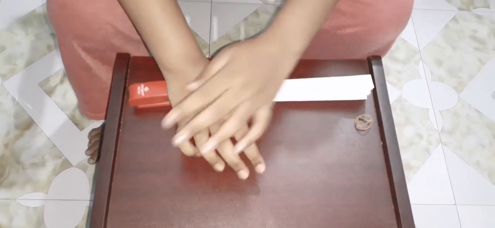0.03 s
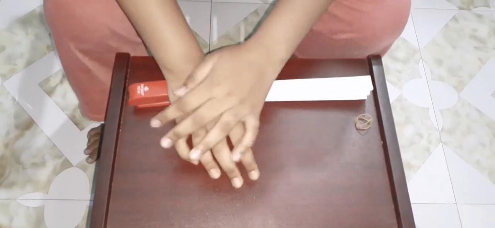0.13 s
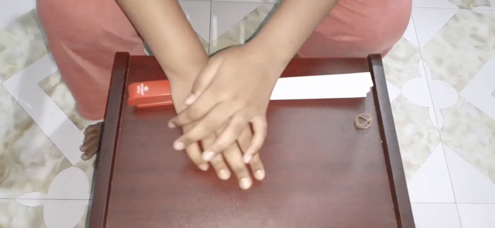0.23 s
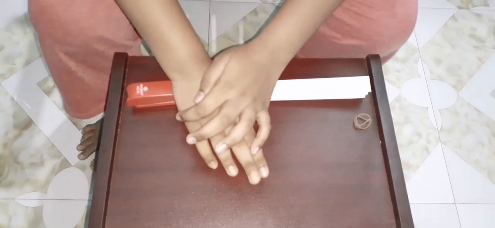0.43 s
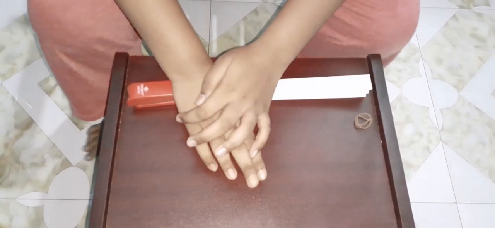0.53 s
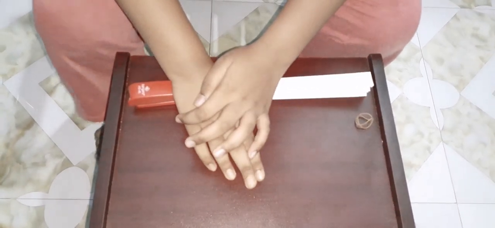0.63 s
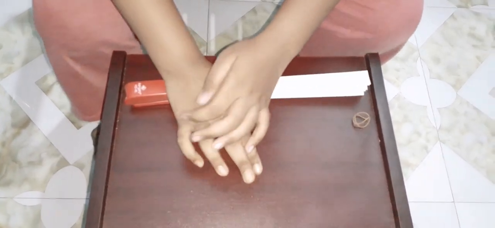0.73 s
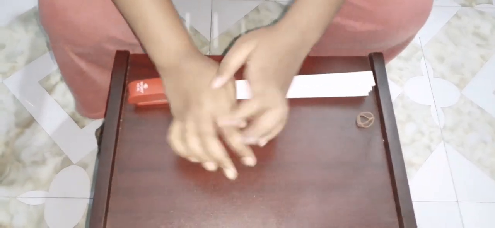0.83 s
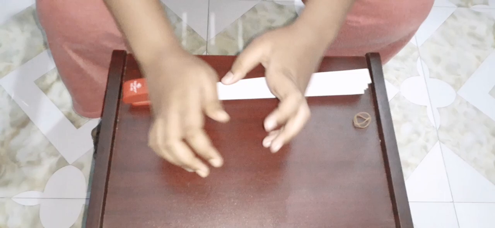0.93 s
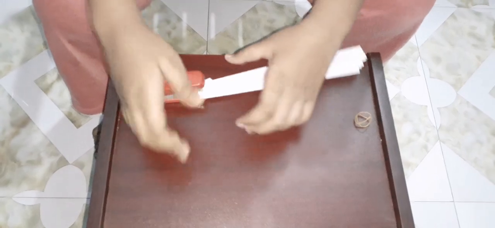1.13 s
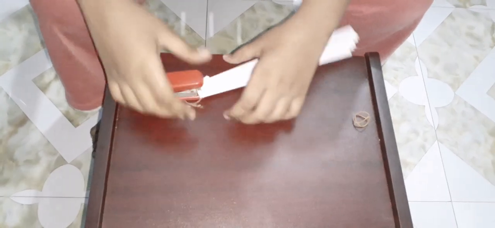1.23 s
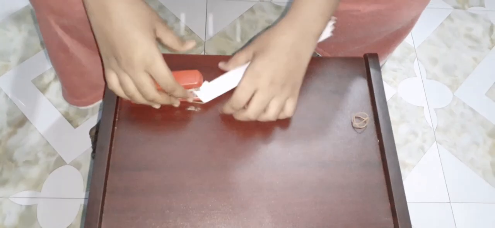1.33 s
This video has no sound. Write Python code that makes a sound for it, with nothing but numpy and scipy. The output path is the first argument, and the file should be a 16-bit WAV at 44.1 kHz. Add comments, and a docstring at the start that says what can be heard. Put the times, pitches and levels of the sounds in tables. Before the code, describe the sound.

Two sharp smacks of fingers land on a small wooden table at about 0.2 and 0.4 seconds, each with a hollow pop and a short wooden ring. Soft bumps surround them as the weight shifts. Near 0.9 seconds the hands slip apart with a light click and swish, then brush faintly along the top until about 1.4 seconds. The room echoes slightly and has a faint hum.

```python
"""Soft bumps, then two sharp smacks of fingers on a small wooden table in a tiled room.
One hand presses on the other, and the table bumps under the shifting weight. Each smack is a quick
cluster of finger contacts that rings the wood, with a hollow pop of trapped air. Then the hands
slip apart with a click and a swish and brush along the top, over a faint hum."""
import sys
import numpy as np
from scipy import signal
from scipy.fft import rfft, irfft
from scipy.io import wavfile
from scipy.ndimage import uniform_filter1d

SR = 44100
rng = np.random.default_rng(int(sys.argv[2]) if len(sys.argv) > 2 else 0)


def put_to_file(sound):
    """Save the sound as 16-bit audio at rate SR, in the file named by the first command-line argument."""
    columns = np.atleast_2d(sound).T  # one column per channel
    safe = np.clip(columns, -1, 1)
    whole_steps = np.round(safe * 32767)
    wavfile.write(sys.argv[1], SR, whole_steps.astype(np.int16))


N = 61739
T = np.arange(N) / SR  # time/s
F = np.arange(N + 1) * SR / (2 * N)  # f/Hz


# fingers hitting the top: t/s, level/dB, rise/s, decay/s, brightness/dB per octave
FINGER_HITS = [(0.2093, -15, 0.0021, 0.0016, -3), (0.2116, -11, 0.0013, 0.0059, -0.8),
               (0.2213, -18.5, .001, 0.009, 4), (0.2238, -20, 0.00074, .005, -1.6),
               (0.4094, -27.5, 0.0018, .002, -0.5), (0.4120, -14, 0.0012, .003, -1.5),
               (0.4171, -9, 0.0024, 0.0035, 0.16), (0.4321, -17, 0.00074, .003, -2)]
# tone of skin on wood: f/Hz, level/dB
SMACK_TONE = [(60, -10.5), (300, 2), (450, 0), (580, -7), (800, -7), (1100, 3), (1500, -2.5), (2000, -1.5),
              (2700, -6.5), (4000, -7), (5500, -5.5), (6200, -9.5), (7000, -6.5), (8500, -10), (9800, -12),
              (11200, -7.5), (12300, -15.5), (15500, -16)]

def smacks():
    """Each finger lands with its own short crack of noise."""
    return sum(undb(db) * shape(burst(start, rise, decay), colour(SMACK_TONE, tilt))
               for start, db, rise, decay, tilt in FINGER_HITS)


# notes the table rings at: f/Hz, level at place 0/dB, level at place 1/dB, ring time/s
WOOD_NOTES = [(180.1, -29, -26.5, 0.27), (227.8, -27.5, -19, 0.3), (262.9, -22, -31, 0.36),
              (298, -35, -45, 0.69), (334.5, -28, -24, 0.39), (414, -27.5, -64, 0.21),
              (582.6, -33, -34, 0.35), (727, -31.5, -59, 0.3), (1028, -28, -22, 0.22),
              (1216, -43, -40, 0.22), (1400, -20.5, -30, 0.049), (1848, -20, -21, 0.048),
              (1938, -24, -45, 0.12), (3153, -25, -64, 0.2), (3875, -24, -36, .08), (4470, -27, -64, 0.16),
              (5450, -55, -28.5, 0.11)]
# blows to the top: t/s, level/dB, place/0-1, rise/s, pop level/dB, pop ring time/s
BLOWS = [(0.2105, 1, 0.07, 0.0013, -10.5, 0.04), (0.417, 0.5, 0.8, 0.00035, -12, 0.053),
         (0.4283, -14, 0.95, 0.0011, -25, .03), (0.8663, -19.5, 0.38, 0.0008, -29.5, 0.02)]

def table_ring():
    """A blow rings all the table's notes at once; where it lands sets the mix."""
    out = np.zeros(N)
    for start, blow_db, place, rise, _, _ in BLOWS:
        for k, (hz, db0, db1, ring_s) in enumerate(WOOD_NOTES):
            note_db = np.interp(place, (0, 1), (db0, db1))
            direction = (-1) ** k  # neighbouring notes swing opposite ways
            out += direction * undb(blow_db + note_db) * ring(start, hz, rise, ring_s)
    return out


def air_pops(hz=1029.5, rise=0.001):
    """Air squeezed from under the hand gives every blow a hollow pop."""
    return sum(undb(db) * ring(start, hz, rise, ring_s) for start, _, _, _, db, ring_s in BLOWS)


# soft bumps of hands and table legs: t/s, level/dB, f/Hz, half-length/s
SOFT_BUMPS = [(0.069, -27, 116, 0.0039), (0.086, -34.5, 88, 0.0056), (0.2153, -8, 291, 0.0022),
              (0.219, -17, 137.5, 0.0077), (0.255, -26.5, 256, 0.011), (0.296, -22.5, 383, 0.0064),
              (0.298, -32, 110, 0.0052), (0.322, -24.5, 241, 0.0031), (0.367, -30.5, 343, 0.0069),
              (0.379, -30, 129, 0.0072), (0.383, -34, 249, 0.014), (0.4122, -13.5, 290, 0.0025),
              (0.4215, -9, 280, 0.0026), (0.464, -18, 226, 0.0098), (0.475, -30, 81, 0.015),
              (0.500, -28, 222, 0.0089), (0.555, -38, 320, 0.009), (0.563, -40, 58, 0.014),
              (0.659, -30.5, 108.6, 0.011), (0.707, -30, 93, 0.0068), (0.731, -29.5, 100, 0.0059),
              (0.817, -28.5, 108, 0.0042), (0.856, -31, 85, 0.0074), (0.872, -27, 284, 0.0033),
              (1.307, -32.5, 100, 0.0054), (1.32, -36, 230, 0.005), (1.361, -32.5, 102, 0.0064),
              (1.383, -40, 104, 0.018)]

def bumps():
    """Cushioned shoves rock the table for a few swings."""
    return sum(undb(db) * np.exp(-((T - middle) / width) ** 2) * np.sin(2 * np.pi * hz * (T - middle))
               for middle, db, hz, width in SOFT_BUMPS)


# light taps of fingers and objects: t/s, level/dB, decay/s
LIGHT_TAPS = [(0.3623, -27, 0.0077), (0.445, -20.5, 0.0039), (0.548, -37, 0.008), (0.9, -38, 0.0056),
              (1.316, -41.5, 0.0083)]
# dull tone of a tap: f/Hz, level/dB
TAP_TONE = [(60, -16.5), (200, 6), (450, -4.5), (1000, -6), (2200, -12.5), (5000, -46), (15000, -70)]

def taps(rise=0.0024):
    """Small touches on the top make dull puffs of noise."""
    touches = sum(undb(db) * burst(start, rise, decay) for start, db, decay in LIGHT_TAPS)
    return shape(touches, colour(TAP_TONE))


# skin slipping over skin: t/s, level/dB, decay/s, brightness/dB per octave
SLIPS = [(0.8651, -22.5, 0.0039, -.8), (0.917, -29, 0.003, -0.8), (0.939, -36.5, 0.0045, -0.5)]
# tone of a slip: f/Hz, level/dB
SLIP_TONE = [(300, -14), (1000, -4.5), (1400, -10), (2100, 1.5), (2800, -6.5), (3500, -3.5), (3950, -2.5),
             (4500, 1), (5000, 3.5), (5500, 0), (6800, -1.5), (11800, -6), (13000, -8), (15500, -12)]

def swishes(rise=0.0021):
    """The upper hand slips over the lower one in short, bright jerks."""
    return sum(undb(db) * shape(burst(start, rise, decay), colour(SLIP_TONE, tilt))
               for start, db, decay, tilt in SLIPS)


# notes in the click: f/Hz, level/dB, ring time/s
CLICK_NOTES = [(3450, -44.5, 0.18), (5450, -16, .012)]

def click(start=0.8662, rise=0.0014):
    """A small, bright ping sounds as the hands part."""
    return sum(undb(db) * ring(start, hz, rise, ring_s) for hz, db, ring_s in CLICK_NOTES)


# loudness of the hands brushing along: t/s, level/dB
BRUSH_LEVEL = [(0, -92), (.74, -69), (.85, -60), (.9, -60), (1.05, -62), (1.18, -53.5), (1.31, -53),
               (1.4, -60.5)]
# hissy tone of the brushing: f/Hz, level/dB
BRUSH_TONE = [(500, -7.5), (1600, -24), (3000, -1), (6500, 3.5), (9000, -1.5), (11600, 4), (15500, -6.5)]

def brushing(rough_db=1, grip_samples=500):
    """Skin rubs along the wood with a faint, uneven hiss."""
    grip = uniform_filter1d(rng.standard_normal(N), grip_samples) * np.sqrt(grip_samples)
    level_db = np.interp(T, *np.array(BRUSH_LEVEL).T) + rough_db * grip
    return shape(noise(), colour(BRUSH_TONE)) * undb(level_db)


# the room's echo, band by band: f/Hz, ring time/s, level/dB
ECHO_BANDS = [(100, 1, 2), (280, 0.31, -1), (543, 0.59, 1.5), (1040, 0.46, -4.5), (2500, 0.38, -1.5),
              (6070, 0.36, -5), (14900, 0.29, -1.5)]

def room_echo(delay_s=0.0046, early_db=-7, early_ring_s=0.18):
    """A filter for hard walls: dense first echoes, then a tail that dies sooner in the treble."""
    def fade(ring_s):
        envelope = (T > delay_s) * np.exp(-np.log(1000) * T / ring_s)
        return envelope / np.sqrt(np.sum(envelope ** 2))
    tail = noise()
    echo = undb(early_db) * noise() * fade(early_ring_s)
    for hz, ring_s, db in ECHO_BANDS:
        band = across([(row[0], row[0] == hz) for row in ECHO_BANDS])
        echo += undb(db) * shape(tail, band) * fade(ring_s)
    return rfft(echo, 2 * N)


# tone of the room air: f/Hz, level/dB
AIR_TONE = [(25, -16), (60, -6.5), (110, -8.5), (170, -7), (270, -8), (380, -5), (520, -4), (620, -7.5),
            (780, -6), (1150, -14), (1750, -14), (2700, -24.5), (4900, -29.5), (6200, -34), (8700, -35.5),
            (15500, -49.5)]
# notes of the hum: f/Hz, level/dB
HUM_NOTES = [(350, -53), (416, -53.5)]

def air_and_hum(air_db=-41.5, hum_width_hz=6.6):
    """Steady room air, plus two bands of noise so narrow that they sound like wavering notes."""
    out = undb(air_db) * shape(noise(), colour(AIR_TONE))
    for hz, db in HUM_NOTES:
        hum = shape(noise(), 1 / (1 + ((F - hz) / hum_width_hz * 2) ** 2))
        out += undb(db) * hum / hum.std()
    return out


# how alike left and right are: f/Hz, likeness (-1 opposite, 1 the same)
EAR_LIKENESS = [(35, -0.17), (65, -0.7), (120, 0.12), (300, 0.75), (600, 0.73), (1100, 0.4), (2200, -0.34),
                (4500, -0.11), (8000, -0.064), (15000, 0.3)]

def noise():
    """Stereo noise, alike in both ears in the low middle and wide in the treble."""
    like = across(EAR_LIKENESS)
    mid, side = (shape(rng.standard_normal(N), np.sqrt((1 + sign * like) / 2)) for sign in (1, -1))
    return np.array([mid + side, mid - side])


def burst(start, rise, decay):
    """Noise that rises in a straight line, then dies away."""
    age = np.maximum(T - start, 0)
    return noise() * np.minimum(age / rise, 1) * np.exp(-np.maximum(age - rise, 0) / decay)


def ring(start, hz, rise, ring_s):
    """One pure note that fades by 60 dB over its ring time."""
    age = np.maximum(T - start, 0)
    return np.sin(2 * np.pi * hz * age) * (1 - np.exp(-age / rise)) * np.exp(-np.log(1000) * age / ring_s)


def undb(db):
    """Turn decibels into a multiplier."""
    return 10 ** (np.asarray(db) / 20)


def across(points):
    """Spread a table of (f/Hz, value) over all frequencies."""
    hz, value = np.array(points).T
    return np.interp(np.log(F + 1), np.log(hz), value)


def shape(x, gain):
    """Filter a sound: turn each frequency up or down."""
    return irfft(rfft(x, 2 * N) * gain)[..., :N]


def colour(points, tilt_db=0):
    """Make a filter that keeps noise equally strong, from a tone table and a tilt per octave."""
    gain = undb(across(points) + tilt_db * np.log2(1 + F / points[1][0]))
    gain /= np.sqrt(np.mean(gain ** 2))
    cepstrum = irfft(np.log(gain))
    folded = np.r_[cepstrum[0], 2 * cepstrum[1:N]]  # so nothing sounds before its cause
    return np.exp(rfft(folded, 2 * N))


def lean_left(x, points):
    """Make the left side louder than the right by a table of (f/Hz, level/dB)."""
    db = across(points)
    return shape(x, undb([db / 2, -db / 2]))


# how much louder the hands and table are on the left: f/Hz, level/dB
HANDS_LEFT = [(300, 0.5), (1000, 0.3), (2200, 1.5), (4500, -1), (8000, 0), (13000, 1.5)]
# the same for the air and hum: f/Hz, level/dB
AIR_LEFT = [(40, 3), (90, 18.5), (250, 1), (1000, -1), (12000, 2)]

def scene():
    """Hands and table with their echo, over the quiet brushing, air and hum."""
    skin = smacks() + taps()
    wood, pops, thuds, slips = table_ring(), air_pops(), bumps(), swishes()
    direct = skin + wood + pops + thuds + slips + click()
    to_walls = skin + undb(-13) * wood + undb(-7) * pops + undb(-10) * thuds + undb(1) * slips
    # each side is reflected to both ears
    echo = (shape(to_walls, room_echo()) + shape(to_walls[::-1], room_echo())) / np.sqrt(2)
    return lean_left(direct + echo, HANDS_LEFT) + brushing() + lean_left(air_and_hum(), AIR_LEFT)


def record(dry):
    """Cut the highest treble, above 15800 Hz."""
    return signal.sosfilt(signal.ellip(10, .2, 80, 15800, fs=SR, output="sos"), dry)


dry = scene()
out = record(dry)
put_to_file(out)
```